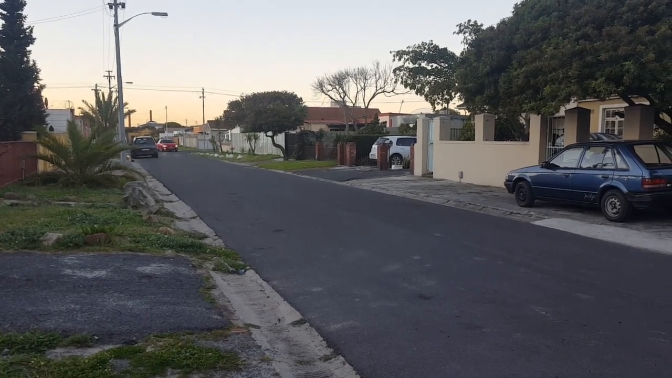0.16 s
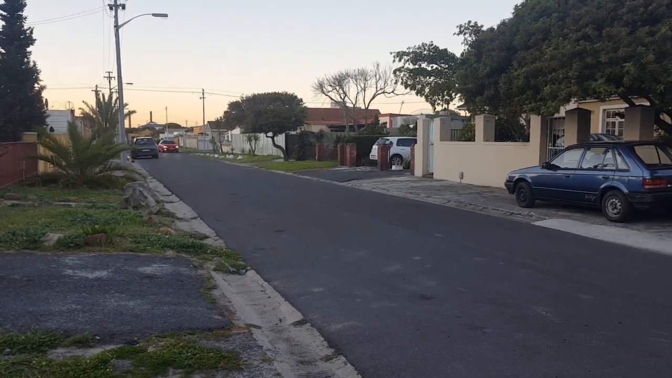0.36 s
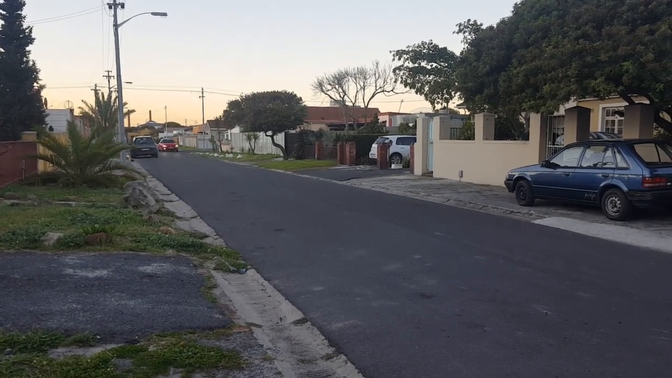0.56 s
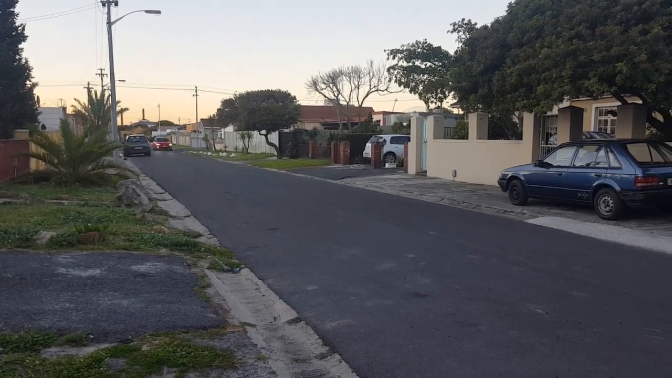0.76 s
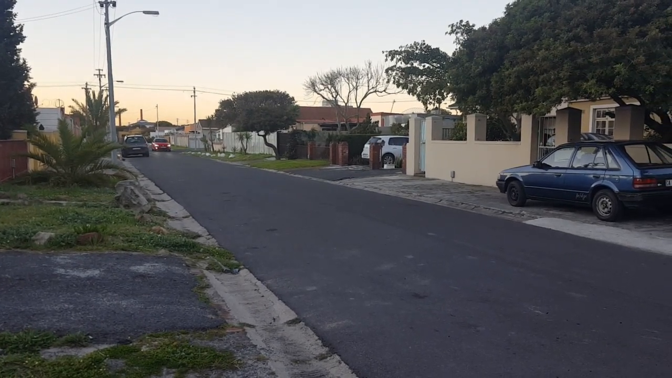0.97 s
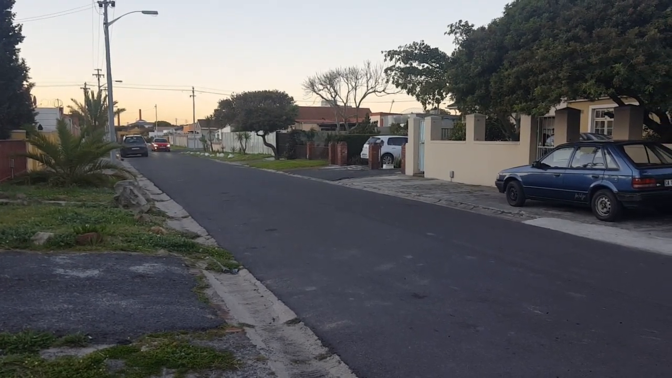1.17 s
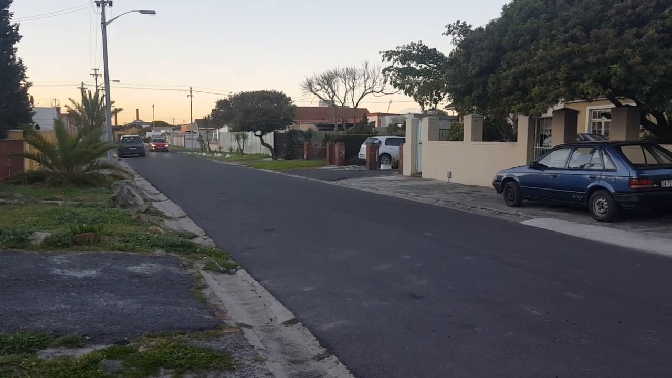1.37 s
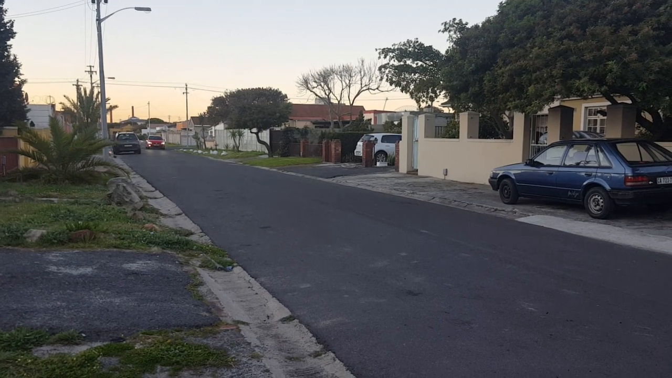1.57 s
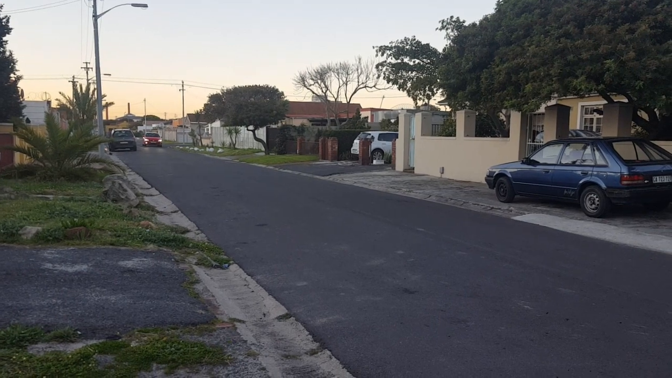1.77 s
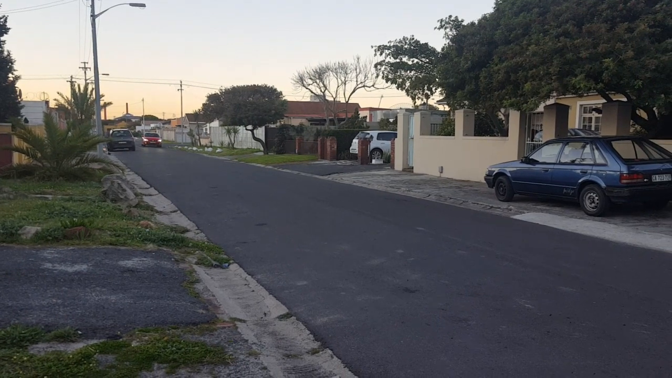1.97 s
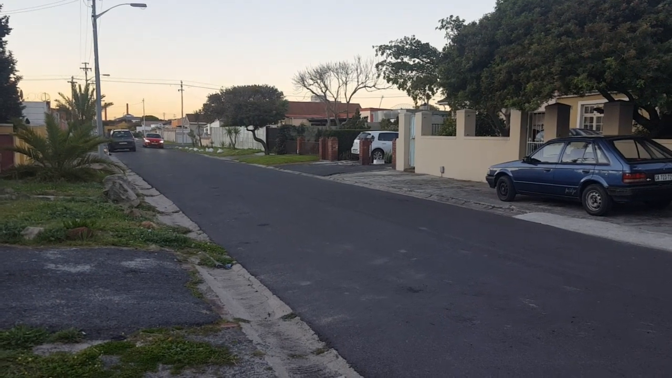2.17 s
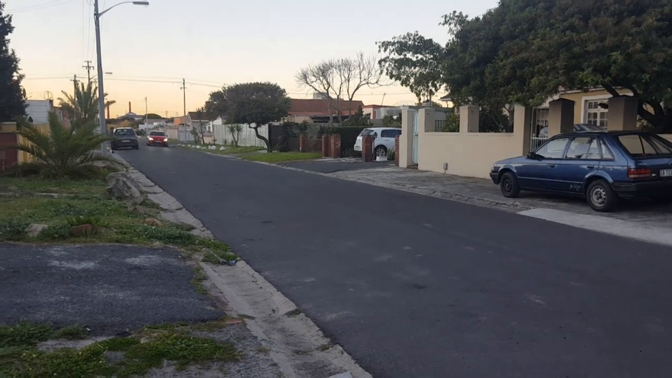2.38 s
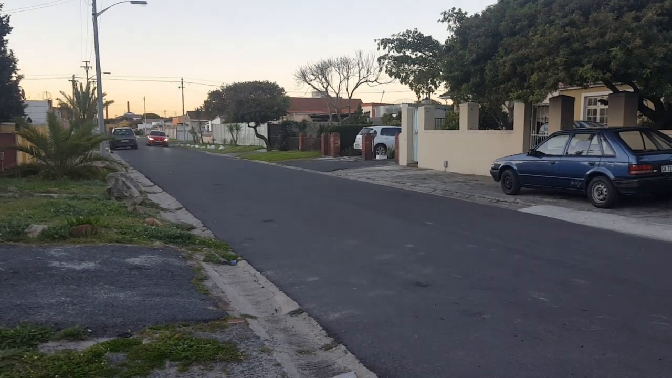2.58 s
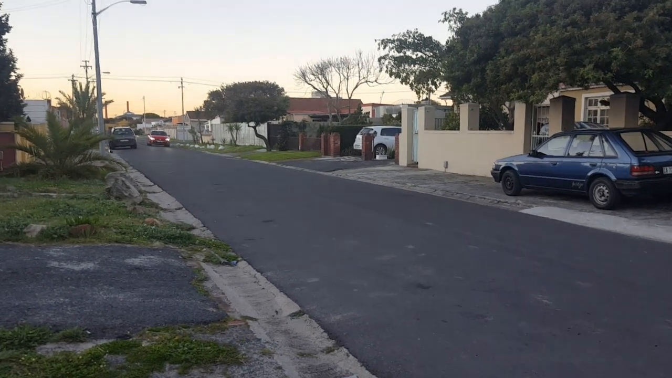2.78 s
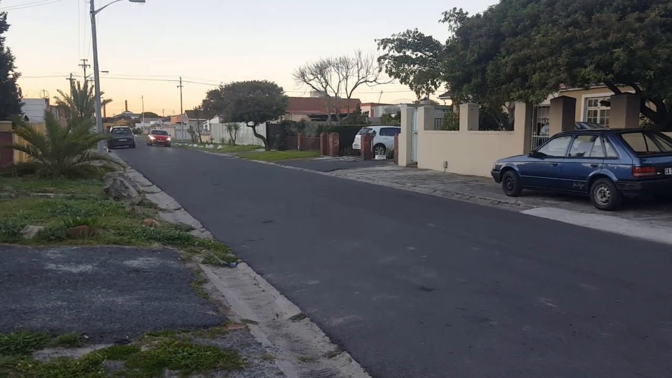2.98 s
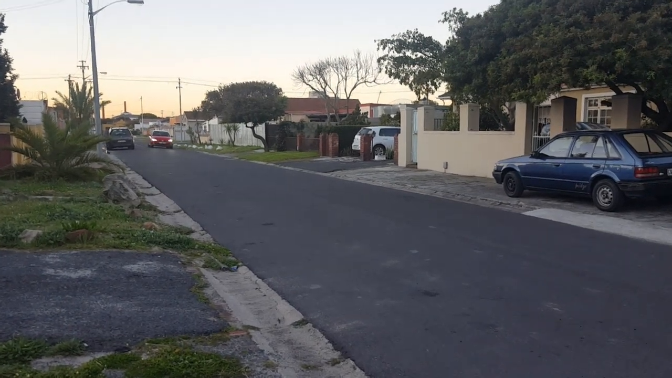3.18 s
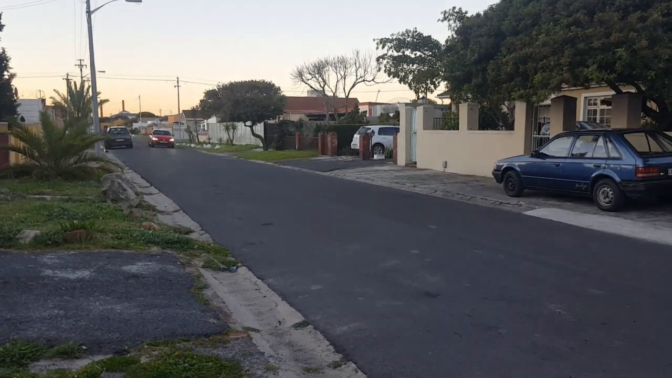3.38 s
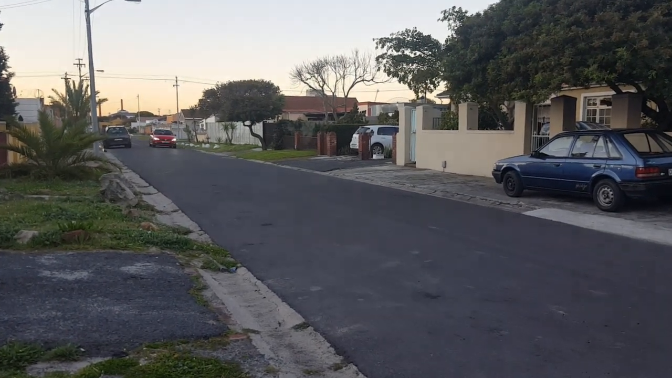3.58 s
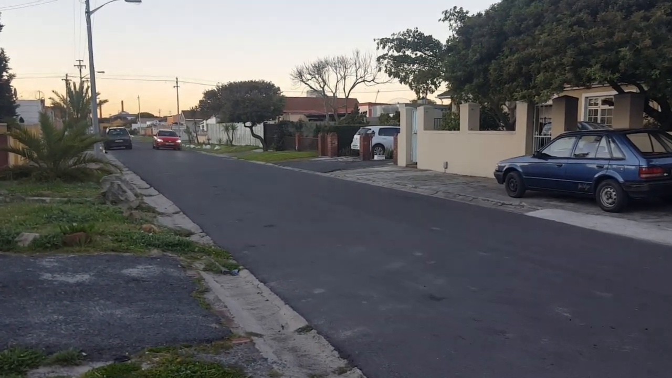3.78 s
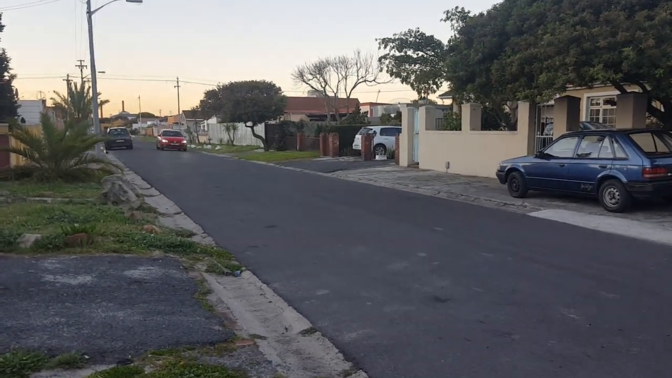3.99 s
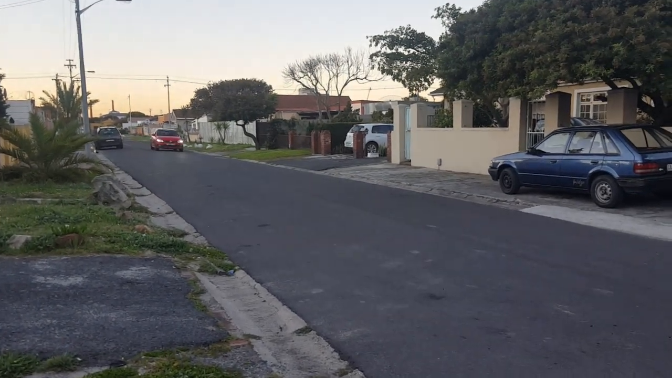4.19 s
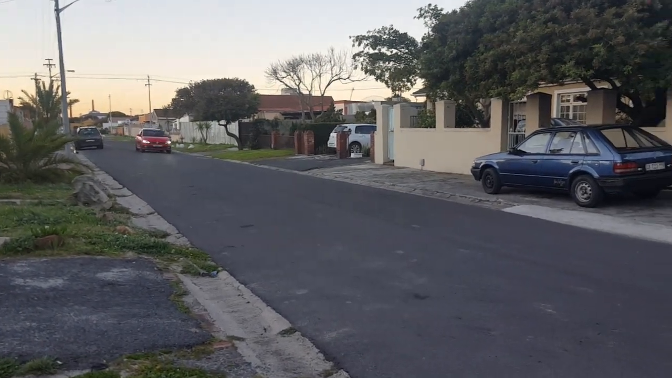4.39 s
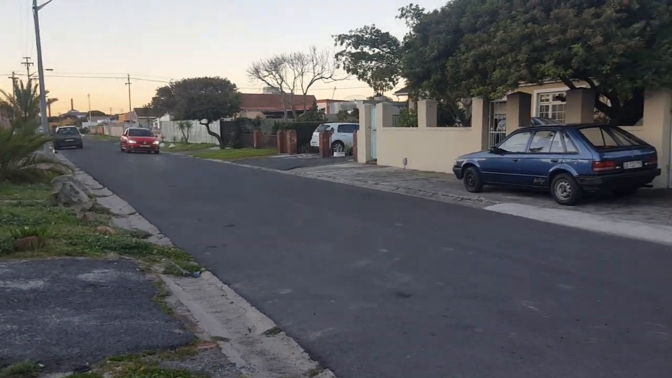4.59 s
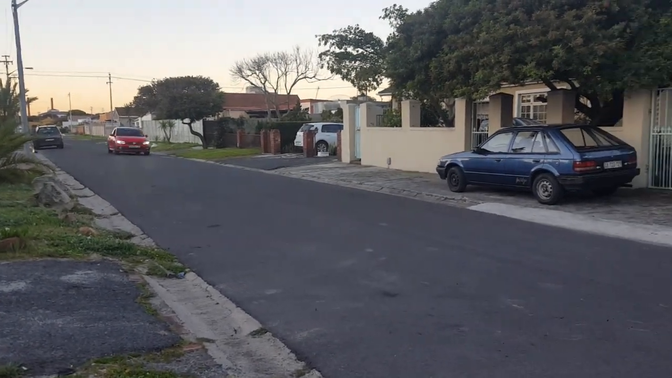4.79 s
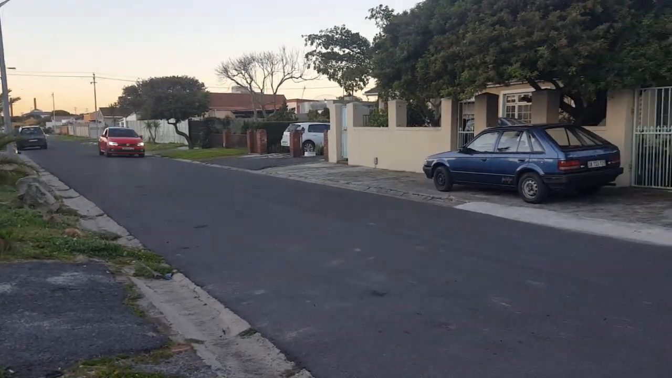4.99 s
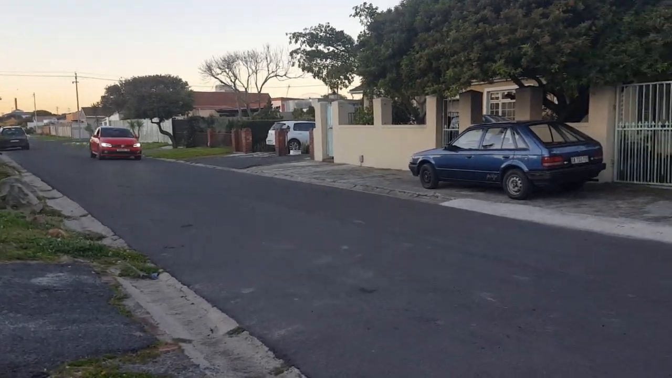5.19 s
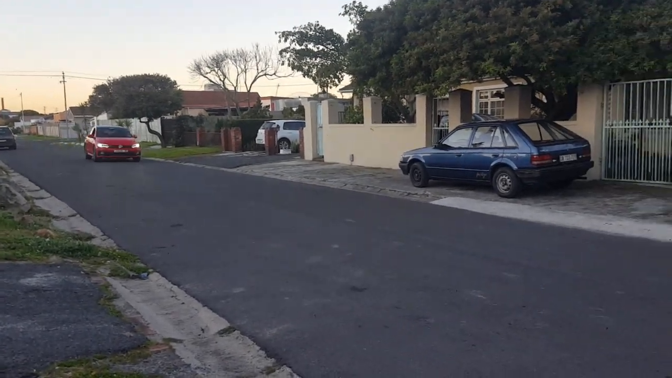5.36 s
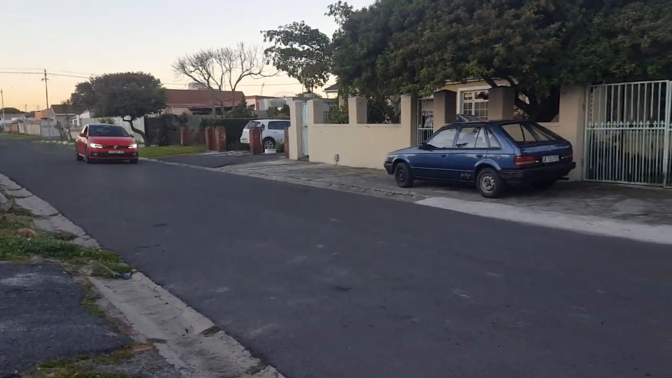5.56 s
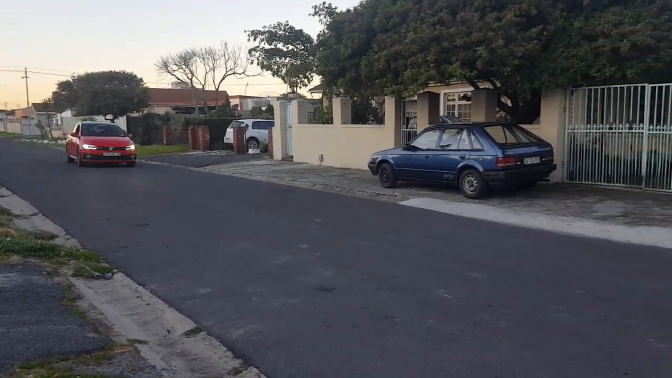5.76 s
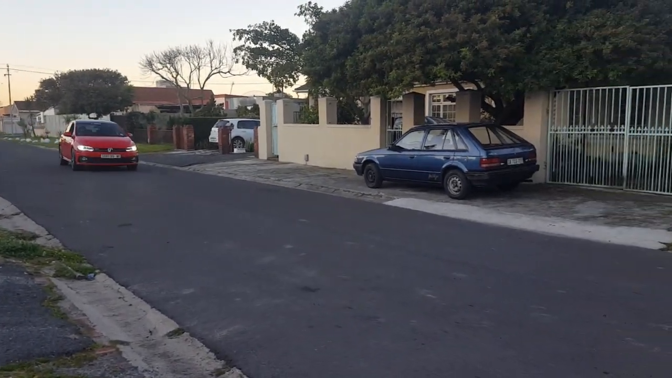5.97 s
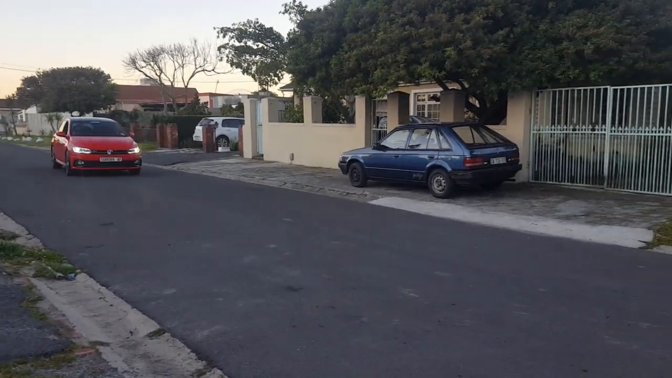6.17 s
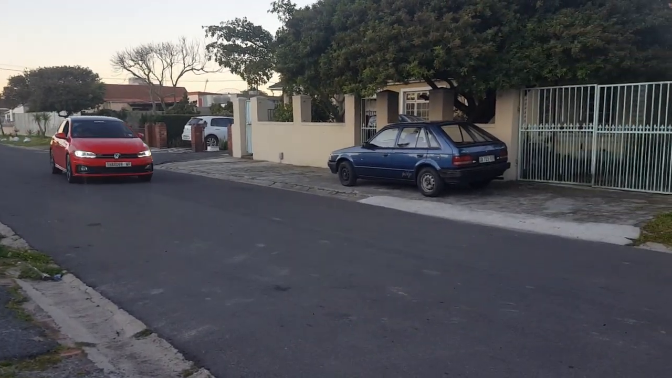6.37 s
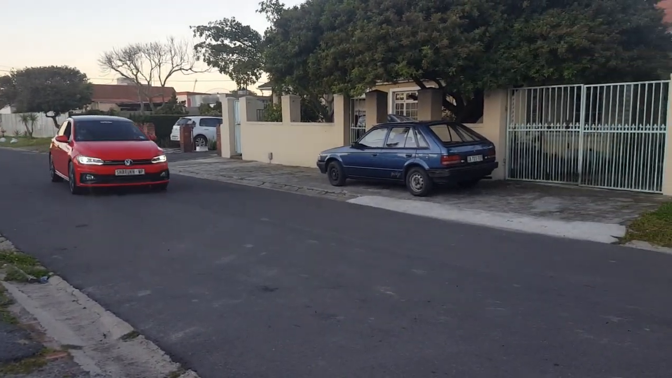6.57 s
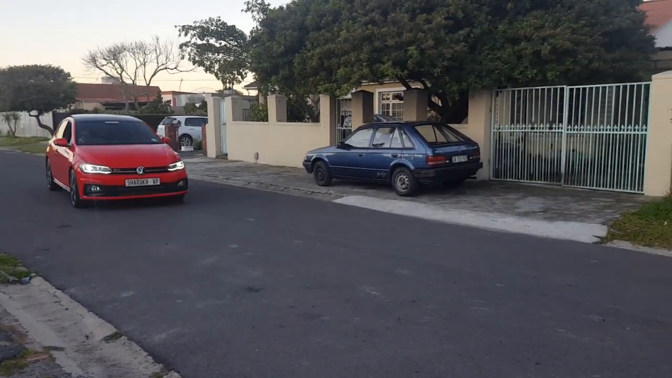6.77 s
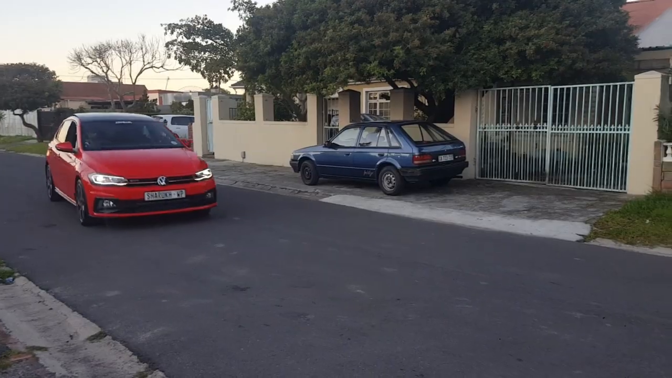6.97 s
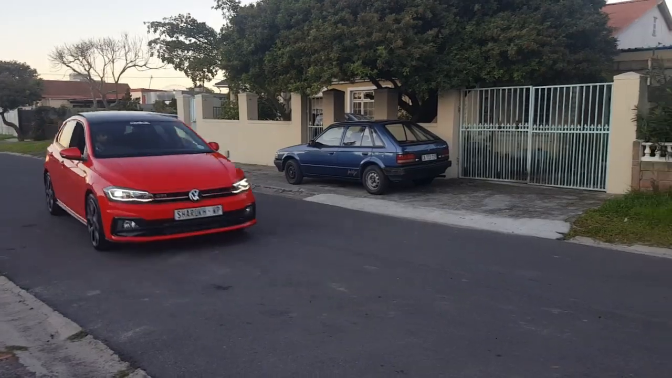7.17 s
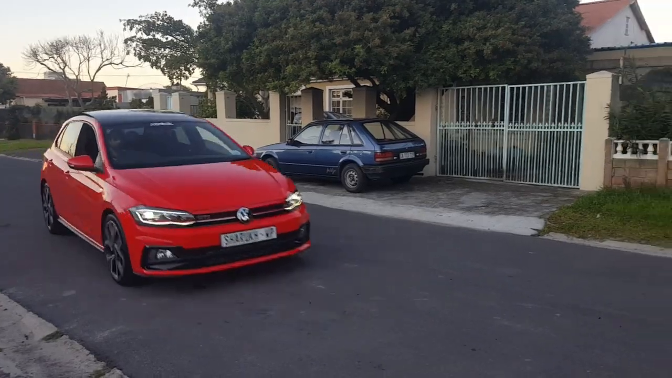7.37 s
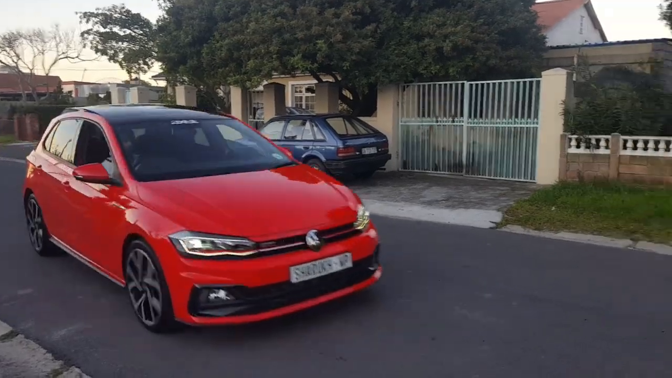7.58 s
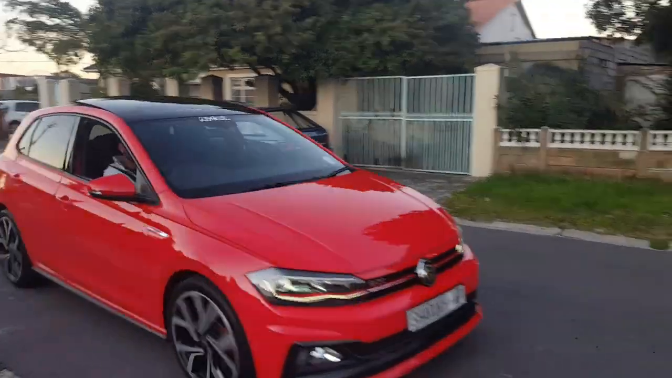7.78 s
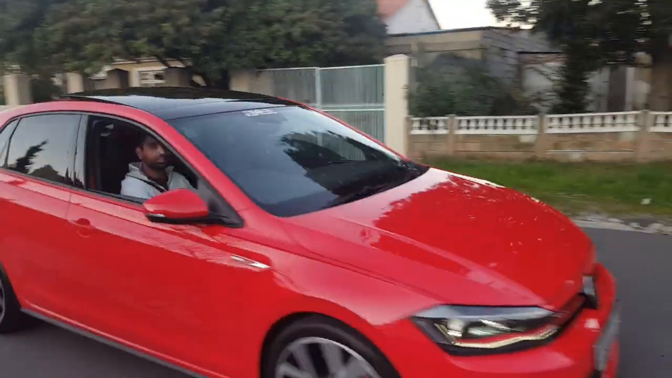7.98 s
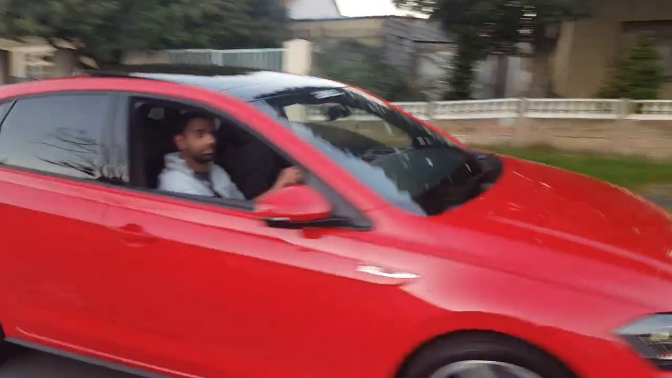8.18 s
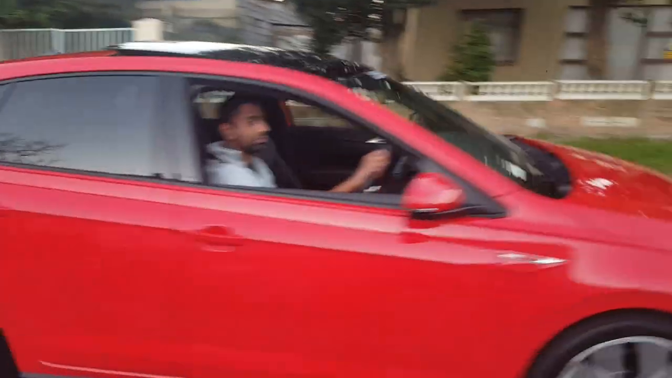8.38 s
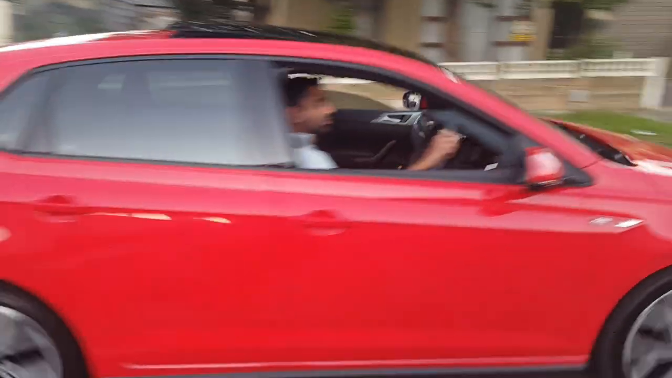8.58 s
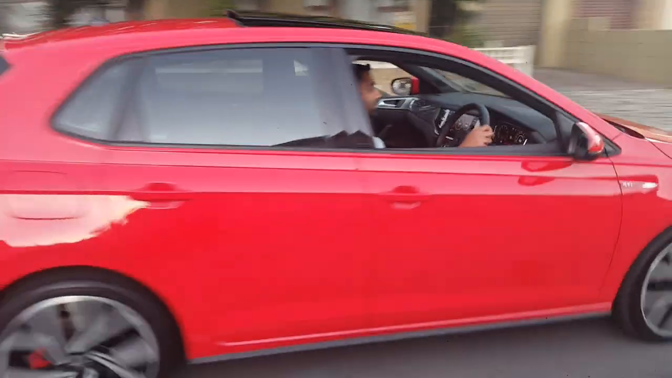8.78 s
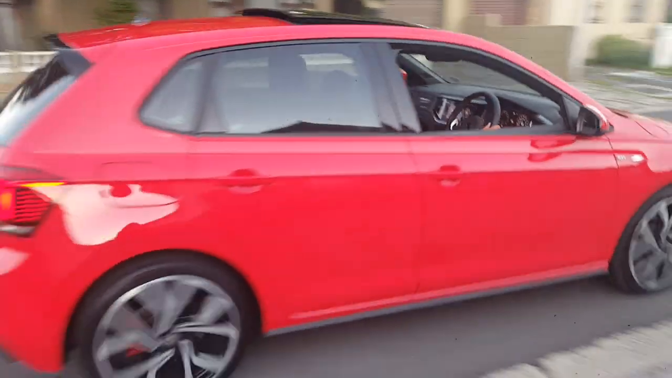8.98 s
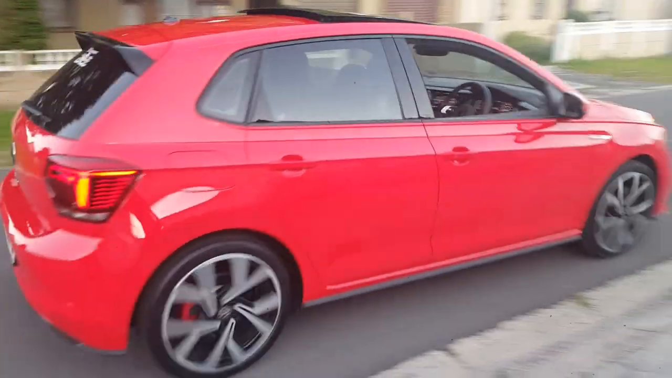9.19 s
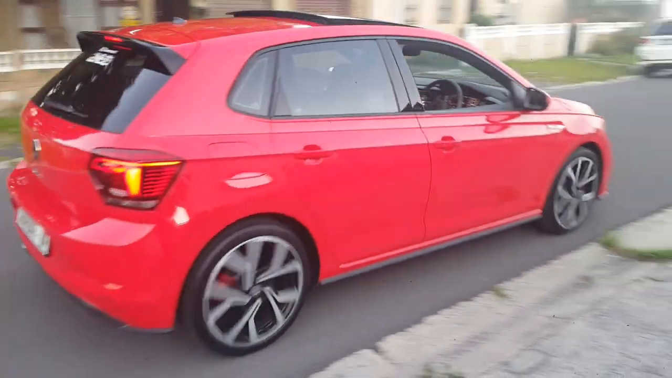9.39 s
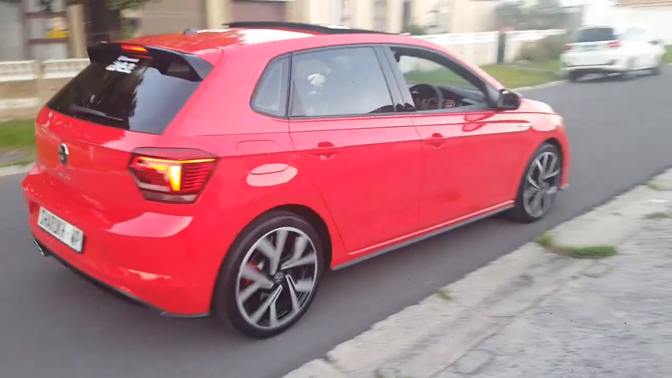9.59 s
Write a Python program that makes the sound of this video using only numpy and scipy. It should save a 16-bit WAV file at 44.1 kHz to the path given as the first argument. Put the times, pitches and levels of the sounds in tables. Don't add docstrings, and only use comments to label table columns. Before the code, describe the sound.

A loud-exhaust hatchback accelerates up a quiet walled street, shifts with pops, crackles on the overrun as it sweeps past close, then settles to a low idle throb.

```python
import sys
import numpy as np
from scipy import signal
from scipy.fft import rfft, irfft, next_fast_len
from scipy.io import wavfile
from scipy.ndimage import uniform_filter1d, map_coordinates

SR = 44100
rng = np.random.default_rng(int(sys.argv[2]) if len(sys.argv) > 2 else 0)


def store_pcm(level_fs):
    pcm = np.round(np.clip(level_fs, -1, 1) * 32767).astype(np.int16)
    wavfile.write(sys.argv[1], SR, np.atleast_2d(pcm).T)


def voltage_ratio(level):
    return 10 ** (np.asarray(level, float) / 20)


N = 425565
T = np.arange(N) / SR
ABREAST_S = 7.8

# t/s, left channel's lead/samples
BEARING = [(0, 10), (6.5, 14.5), (7.3, 11.5), (7.75, 1.5), (8.2, -12), (8.8, -10), (9.65, -6.5)]
# t/s, level/dB
EFFORT = [(0, -39), (0.5, -39.5), (0.76, -35), (1.8, -36), (2.09, -29), (2.6, -35), (2.9, -34.5),
          (3.15, -33), (3.75, -21), (4.3, -28), (4.64, -25), (5.5, -27.5), (6.1, -23.5), (7.4, -12.5),
          (8.44, -8.5), (8.8, -14.5), (9.3, -11), (9.65, -15.5)]
# t/s, lift/dB
ROUGH = [(0, 0.5), (1.6, 3), (2.2, 1), (3.2, 1), (3.75, -7), (4.3, -4), (5.1, 2), (5.5, 7), (6.7, 2.5),
         (7.2, -3.5), (8.3, -6.5), (9.1, -11), (9.65, -7)]


def unit(x):
    return x / np.sqrt(np.mean(np.abs(x) ** 2) + 1e-20)


def along(points, hz):
    f, v = np.transpose(points)
    return np.interp(np.log(hz + 1), np.log(f + 1), v)


def curves(rows, t=T):
    s, *cols = np.transpose(rows)
    return [np.interp(t, s, c) for c in cols]


def wobble(rate):
    coarse = T[::32]
    knots = rng.standard_normal(int(N * rate / SR) + 4)
    return np.interp(T, coarse, map_coordinates(knots, [coarse * rate]))


def filtered(x, response):
    m = next_fast_len(N + SR // 4)
    return irfft(rfft(x, m) * response(np.fft.rfftfreq(m, 1 / SR)), m)[..., :N]


def ring(f, c, w, db):
    return voltage_ratio(db) * 1j * f * w / (c * c - f * f + 1j * f * w)


def colour(points, hz, stretch=1):
    return unit(voltage_ratio(along(points, hz / stretch)))


def patches(hz, t):
    field = rng.standard_normal((len(hz), len(t)))
    return unit(uniform_filter1d(uniform_filter1d(field, size=4, axis=0), size=12, axis=1))


def engine(t=T):
    # t/s, f/Hz
    speed = [(0, 34.48), (.42, 36.83), (.86, 48.12), (1.32, 62.74), (2.06, 81.12), (2.2, 82.1), (2.7, 82.4),
             (3.73, 102.3), (4.28, 112.4), (4.75, 116.7), (5.12, 108.6), (5.9, 100.6), (6.33, 92),
             (6.9, 76.94), (7.85, 48.17), (8.5, 32.11), (9.05, 28.18), (9.65, 30.24)]
    # t/s, ratio to second gear
    gears = [(2.23, 1.36), (2.35, 1), (5.15, 1), (5.35, .645), (5.656, .64), (5.87, 1)]
    return curves(speed, t)[0] * curves(gears, t)[0], curves(EFFORT, t)[0]


def town(hz):
    drone = [(15, -10.5), (35, 0), (60, -3.5), (120, -42), (300, -120)]  # f/Hz, level/dB per Hz
    # f/Hz, level/dB per Hz
    traffic = [(1500, -23), (2200, -2), (3600, 2), (5000, -20.5), (7000, -28.5), (9000, -120)]
    return (voltage_ratio(-63) * colour(drone, hz)) ** 2 + (voltage_ratio(-65) * colour(traffic, hz)) ** 2


def far_engine():
    # t/s, f/Hz, level/dB
    hum = [(0.0, 107.5, -52), (0.102, 108.2, -63), (0.262, 97.4, -62), (0.58, 104.3, -61),
           (0.696, 95.4, -35.5), (0.944, 90.96, -53), (1.506, 87.44, -46.5), (1.75, 83, -67)]
    hz, db = curves(hum)
    fade = np.clip((1.75 - T) / .1, 0, 1)
    return np.sqrt(2) * fade * voltage_ratio(db + 4.3 * wobble(12.0)) * np.sin(2 * np.pi * np.cumsum(hz) / SR)


def bird():
    # t/s, f/Hz, level/dB, length/s
    chirps = [
        (0.697, 3580, -63, 0.07),
        (.785, 3350, -59.5, 0.05),
        (0.85, 3520, -65, 0.09),
    ]
    out, hoarse = np.zeros(N), wobble(150)
    for s, hz, db, length in chirps:
        u = np.clip((T - s) / length, 0, 1)
        pitch = hz * (1.06 - 0.113 * u + 0.035 * hoarse)
        out += voltage_ratio(db - 2) * np.sin(np.pi * u) * np.sin(2 * np.pi * np.cumsum(pitch) / SR)
    return out


def body_rumble(hz, t):
    # f/Hz, level/dB per Hz
    rumble = [(12, -37), (30, -34), (60, -7.5), (110, -1.5), (200, -8), (340, -5), (400, -32.5),
              (600, -41.5), (1000, -120)]
    lumps = np.interp(t, T, wobble(8))
    strength_db = curves(EFFORT, t)[0] + curves(ROUGH, t)[0] - 12
    return voltage_ratio(strength_db + .7 * lumps + 1.5 * patches(hz, t)) * colour(rumble, hz)


def tyre_roar(hz, t, roar_db, far, past, swell, surge_db):
    # f/Hz, level/dB per Hz
    coming = [(220, -43), (380, -3.5), (500, -12.5), (662, -1), (843, -21), (1010, -12), (1200, -11),
              (1370, -26.5), (1720, -7.5), (2110, -22.5), (2600, -28.5), (3380, -63), (5720, -120)]
    near = [(220, -39.5), (380, -14.5), (415, -8), (450, 4.5), (533, -7), (631, 3.5), (678, 0), (741, -7.5),
            (797, -8.5), (921, -1), (1040, -0.5), (1320, -5.5), (1670, -5.5), (2300, -14.5), (2600, -20.5),
            (3380, -52.5), (5720, -120)]
    leaving = [(220, -22.5), (380, -32), (529, -26.5), (771, 0), (863, 0), (1300, -9), (1570, 2),
               (1870, -4), (2090, 1), (2600, -5), (3380, -8), (5720, -120)]
    roar = far * colour(coming, hz) + (1 - far - past) * colour(near, hz) + past * colour(leaving, hz)
    return roar * voltage_ratio(roar_db + 0.44 * swell + surge_db + 1.42 * patches(hz, t))


def tread_hiss(hz, t, roar_db, far, past, swell, surge_db):
    # f/Hz, level/dB per Hz
    near = [(1290, -29.5), (2200, -6.5), (2340, 3), (2560, 1), (2840, 2), (4130, -2.5), (4790, -6),
            (5150, -4), (5610, -4.5), (6150, -10), (6910, -17), (8150, -34.5), (9500, -38.5),
            (12400, -69.5), (20900, -120)]
    leaving = [(1290, -33.5), (2200, -2.5), (4180, -2.5), (4850, -4), (5930, -9.5), (6830, -19),
               (8720, -21.5), (9500, -46), (12400, -54), (20900, -120)]
    # t/s, frequency stretch
    bright = [(0, 1.27), (3.9, 1.104), (4.7, 1.06), (6.4, 1.08), (7.1, 1.19), (9.65, 0.96)]
    open_tread_db = 1.5 * np.exp(-((t - ABREAST_S) / 1.8) ** 2)
    hiss_db = roar_db - 14.5 + 12.5 * past + 3.5 * far + open_tread_db
    haze_db = -6 * np.sqrt(far) * (hz / 5000) ** 2
    hiss = (1 - past) * colour(near, hz, curves(bright, t)[0]) + past * colour(leaving, hz)
    hiss = hiss * voltage_ratio(hiss_db + haze_db + 0.3 * swell + surge_db + 1.4 * patches(hz, t))
    notch_s, notch_half_s, notch_hz, notch_log_width, notch_db = 5.3, 1.3, 5150, .045, -5
    off_centre = np.log((hz + 1) / notch_hz) / notch_log_width
    return hiss * voltage_ratio(notch_db * np.exp(-((t - notch_s) / notch_half_s) ** 2 - off_centre ** 2))


def bay_air(hz, t, lift_db):
    # f/Hz, level/dB per Hz
    air = [(5000, -31), (8500, 4.5), (10100, -5), (11800, 4.5), (15100, 0.5), (15700, -7)]
    distance = np.hypot(1, (t - ABREAST_S) / 0.58)
    return voltage_ratio(-59.5 - 1.28 * 20 * np.log10(distance) + lift_db) * colour(air, hz)


def road(hz, t):
    # t/s, level/dB
    roar_level = [(0, -59.5), (1, -52), (1.93, -44), (2.6, -43.5), (3.25, -40.5), (3.5, -38), (3.8, -37),
                  (4, -39), (4.65, -35), (5.2, -33), (5.4, -32.5), (5.83, -30), (6.07, -32.5),
                  (6.69, -28.5), (7.82, -30), (8.68, -38.5), (9.65, -42)]
    # t/s, place (far -1, near 0, seen from behind 1)
    passing = [(0, -0.21), (2.5, -0.56), (4, 0.17), (7.3, -0.093), (8.1, 0.49), (9.65, 0.72)]
    # t/s, change/dB, half length/s, f/Hz, air change/dB
    surges = [(2.05, 4, .27, 6800, 1.5), (3.424, 8, .063, 3100, 10), (5.119, 3, .049, 5510, 6),
              (6.8, 4, .059, 7000, 5), (8.724, 2, .11, 5400, -1), (5.45, 4, .2, 1100, 0),
              (6.15, 3, .3, 6000, 0), (6.6, -2, .3, 2800, 0), (7.3, 2, .25, 7500, 0),
              (7.52, 2.5, .15, 2500, 0), (7.1, -2, .15, 3200, 0), (8.55, 2, .2, 5500, 1),
              (5.5, -1, .9, 5150, 0), (3.43, 3, .05, 3000, 0), (8.57, -5, .07, 1700, 0),
              (9.2, -2, .4, 1700, 0), (1.1, 2.5, .2, 1300, 0), (8.74, 4, .04, 1500, 0), (7.5, 2, .2, 620, 0),
              (8.95, -3, .12, 650, 0)]
    roar_db, = curves(roar_level, t)
    place, = curves(passing, t)
    far, past = np.clip(-place, 0, 1), np.clip(place, 0, 1)
    surge_db, air_db = 0, 0
    for s, db, half, c, air_lift in surges:
        bump = np.exp(-((t - s) / half) ** 2)
        surge_db = surge_db + bump * db * (0.078 + np.exp(-np.log((hz + 1) / c) ** 2 / 0.14))
        air_db = air_db + bump * air_lift
    swell = np.interp(t, T, wobble(4))
    power = body_rumble(hz, t) ** 2 + bay_air(hz, t, air_db) ** 2 + town(hz)
    power = power + tyre_roar(hz, t, roar_db, far, past, swell, surge_db) ** 2
    return np.sqrt(power + tread_hiss(hz, t, roar_db, far, past, swell, surge_db) ** 2)


def rush(gain):
    # f/Hz, coherence (0-1)
    alike = [(30, .9), (150, .97), (400, .95), (800, .88), (1500, .76), (3000, .5), (6000, .38),
             (12000, .22)]
    # f/Hz, left minus right/dB
    lean = [(60, 3.5), (180, -0.5), (550, 0.5), (1650, -1), (4970, -1.5), (15000, -2.5)]
    hz, t, z = signal.stft(rng.standard_normal((2, N + 2048)), SR, nperseg=1024)
    turn = np.arccos(np.clip(along(alike, hz), 0, 1))[:, None] / 2
    shaded = hz * (.55 + .45 / (1 + (5000 / (hz + 1)) ** 6))
    lead = np.exp(1j * np.pi * np.outer(shaded, curves(BEARING, t)[0]) / SR)
    lead = lead * voltage_ratio(along(lean, hz) / 2)[:, None]
    mid, side = np.cos(turn) * z[0], np.sin(turn) * z[1]
    pair = np.array([(mid + side) * lead, (mid - side) / lead]) * gain(hz[:, None], t)
    return signal.istft(pair, nperseg=1024)[1][:, :N]


def throb():
    hz = engine()[0]
    depth = .3 * np.exp(-((T - 8.0) / .7) ** 2)
    late_s = .005
    puffs = np.cos(2 * np.pi * (np.cumsum(hz) / SR - hz * late_s))
    return (1 + depth * puffs) / np.sqrt(1 + depth ** 2 / 2)


def grit():
    # t/s, peak level/dB, f/Hz
    stones = [(0.8096, -62.5, 3580), (2.4758, -44, 4180), (2.5235, -47.5, 4500), (2.5444, -50.5, 3564),
              (2.4758, -50.5, 5700), (3.2, -45.5, 3700), (3.6406, -62.5, 11500), (2.4748, -68, 12000),
              (7.797, -50, 7520), (7.797, -58, 11500), (7.913, -52, 4200), (8.12, -48, 7770),
                   (8.12, -58, 12000), (8.77, -40, 2100), (9.095, -58, 13500), (9.312, -44, 2200)]
    out, t = np.zeros((2, N + SR)), np.arange(400) / SR
    for s, db, hz in stones:
        rough = uniform_filter1d(rng.standard_normal((2, len(t))), size=round(36000 / hz)) * 3
        decay = voltage_ratio(db + 8.0 - 60 * t / 0.0047)
        out[:, round(s * SR):][:, :len(t)] += decay * (1 + 0.96 * rough) * np.sin(2 * np.pi * hz * t)

    def small_body(f):
        band = 1 / (1 + (1500 / (f + 1)) ** 4) / (1 + (f / 15000) ** 6)
        return band * (1 - .85 * np.exp(-((f - 9600) / 1000) ** 2))

    return filtered(out[:, :N], small_body)


def brake():
    start_s, end_s, hz, db = 8.28, 8.64, 2870, -53.5
    touch = np.sin(np.pi * np.clip((T - start_s) / (end_s - start_s), 0, 1)) ** .5
    return np.sqrt(2) * touch * voltage_ratio(db + 2.1 * wobble(30)) * np.sin(2 * np.pi * hz * T + .3 * wobble(40))


def pipe(f):
    # f/Hz, width/Hz, level/dB
    modes = [(118, 30, -4), (205, 23, 0.5), (263, 23, 0), (322, 28, 0.5)]
    cut = (1 / (1 - (f / 350) ** 2 + 1j * f / 350 * 1.02)) ** 2
    held = np.clip(f - 120, 0, 260)
    smear_s_per_hz = 2.5e-5
    smear = np.exp(-1j * np.pi * smear_s_per_hz * held * (2 * f - 240 - held))
    return cut * smear * sum((-1) ** k * ring(f, *mode) for k, mode in enumerate(modes))


def shell(f):
    return (ring(f, 635, 60, -15) - ring(f, 520, 200, -27)) * ring(f, 600, 340, 0)


def fade_db(hz, t):
    # t/s, f/Hz, change/dB, half length/s
    fades = [(0.62, 114, -4.0, 0.05), (0.66, 58, -14.5, 0.2), (0.68, 177, 6, 0.074), (1.06, 148, 3.5, 0.08),
             (1.12, 77, -3, 0.13), (1.48, 91, 10.5, 0.048), (1.74, 99, -14.5, 0.22),
             (2.02, 109, -3.5, 0.08), (2.16, 111, -10.5, 0.046), (2.46, 165, -7.5, 0.14),
             (2.6, 82, 11.5, 0.14), (2.74, 166, 9.5, 0.08), (2.88, 86, -20, 0.084), (2.9, 173.1, -9, 0.091),
             (3.12, 182, 2, 0.13), (3.64, 101, -15.5, 0.1), (3.86, 105, 10.5, 0.13),
             (3.98, 106, -22.5, 0.4), (4.28, 112, 8.5, 0.05), (4.5, 114, -9, 0.049), (4.66, 115, 8.5, 0.05),
             (4.68, 116, -9, 0.22), (4.78, 116, -9, 0.046), (5.18, 102.4, 3, 0.4), (5.3, 78, 6, 0.08),
             (5.5, 67, 8.5, 0.14), (5.56, 133.9, -6.5, 0.035), (5.7, 73, -11, 0.048),
             (5.86, 98, -17, 0.062), (6.1, 98, 6.0, 0.086), (6.32, 187, 7.0, 0.23), (6.8, 80, -4.5, 0.08),
             (7.02, 149, -13, 0.39), (7.12, 70, 5.5, 0.099), (7.7, 155, -9, 0.13), (7.74, 101, -7.5, 0.4),
             (8.02, 44.4, 3, 0.4), (8.1, 168, -8, 0.08), (8.38, 140, -9.5, 0.39), (8.52, 94, 3, 0.37),
             (8.78, 60, -10, 0.4), (8.84, 30, -11.5, 0.08), (8.98, 57, 8, 0.05), (8.98, 115, -3, 0.089),
             (9.26, 87, -7, 0.055), (9.58, 60, -2, 0.4),
             (0.525, 214, -7, 0.069), (0.843, 259, 8.5, 0.038), (1.0, 214, -7.0, 0.044),
                (1.08, 225, 7, 0.05), (1.1, 303, -11, 0.1), (1.618, 191, -7, 0.056), (1.64, 288, 8, 0.1),
                (1.78, 202, 4, 0.13), (1.92, 211, -13, 0.043), (2.243, 328, 15.5, 0.077),
                (2.66, 247, -18, 0.055), (2.68, 330, -12.0, 0.08), (2.84, 256, 10, 0.04),
                (3.08, 360, 8, 0.043), (3.32, 190, -15, 0.073), (3.34, 286, 10, 0.073),
                (3.48, 392, 8.0, 0.08), (3.54, 298, -6.5, 0.097), (3.72, 411, -8, 0.08),
                (3.782, 208, -2, 0.1), (3.823, 313, -20.0, 0.077), (3.84, 209, -25, 0.05),
                (3.898, 423, 9.5, 0.4), (4.0, 322, 3.5, 0.087), (4.16, 439, -13.0, 0.08),
                (4.384, 338, -13, 0.035), (4.456, 227, -6.0, 0.13), (4.642, 346, 14, 0.24),
                (4.72, 464, 6, 0.47), (4.4, 346, -4.5, 0.039), (5.04, 220, -15.5, 0.37),
                (5.06, 329, 11, 0.072), (5.16, 319, -6.5, 0.13), (5.202, 294, -12.5, 0.08),
                (5.3, 313, 6.0, 0.33), (5.46, 203, -19, 0.067), (5.68, 210, 8, 0.058),
                (5.8, 359, 16.0, 0.22), (5.86, 298, 7, 0.14), (5.943, 200, -8.5, 0.043),
                (6.26, 281, -6.0, 0.19), (6.8, 318, 15.5, 0.077), (7.338, 191, -17.5, 0.49),
                (7.336, 191, 15, 0.05), (7.44, 242, -9, 0.062), (7.84, 194, 9.5, 0.15)]
    log_width = .16
    return sum(db * np.exp(-((t - s) / half) ** 2 - (np.log(hz / c) / log_width) ** 2)
               for s, c, db, half in fades)


def low_orders(turns, far):
    # f/Hz, level/dB
    outlet = [(30, -32), (55, -18), (80, -10), (115, 0.0), (155, -4), (200, -3), (325, -4.5), (420, -17)]
    order_level = [1, -3, -11, -14.5]
    t = T[::64]
    tones = engine(t)[0] * np.arange(1, 5)[:, None]
    tone_db = along(outlet, tones) + np.c_[order_level] + fade_db(tones, t)
    effort_db = engine()[1]
    thud_hz, thud_width_hz, late_s = 115, 60, .002
    out = np.zeros(N)
    for k, (f, db) in enumerate(zip(tones, tone_db)):
        lag = -np.arctan2(f * thud_width_hz, thud_hz ** 2 - f ** 2) - 2 * np.pi * f * late_s
        shake_db = (.7 + .5 * k) * far * wobble(15) + 0.59 * wobble(12)
        phase = 2 * np.pi * (k + 1) * turns + np.interp(T, t, lag) + 0.09 * (k + 1) * wobble(30)
        out += np.sqrt(2) * voltage_ratio(effort_db + np.interp(T, t, db) + shake_db) * np.cos(phase)
    return out


def firing_pulses(turns, far):
    cylinders = [0.32, 0.51, -0.5, 0.2]
    # t/s, share (0-1)
    unevenness = [(0, .28), (1, .15), (5.1, .1), (5.5, .2), (6.7, .1), (7, .05), (7.6, .05), (8.2, .09),
                  (8.9, .09), (9.65, .05)]
    # t/s, level/dB
    upper_level = [(0, -25.5), (1, -17.5), (2, -10.5), (3, -10.5), (3.75, -20.5), (4.6, -8.5), (5.3, -11.5),
                   (5.6, -3), (6.2, -27), (7.2, -18.5), (7.9, -19), (8.4, -24), (9.0, -33.5), (9.35, -24),
                   (9.65, -19.5)]
    hz, effort_db = engine()
    at = np.flatnonzero(np.diff(np.floor(turns)))
    share = np.clip(curves(unevenness)[0][at], 0, 1)
    spread = share * (np.resize(cylinders, len(at)) + .5 * rng.standard_normal(len(at)))
    even, odd = np.zeros((2, N))
    even[at], odd[at] = 1, 4 * spread
    even -= hz / SR * (1 + sum(2 * np.cos(2 * np.pi * k * turns) for k in range(1, 5)))
    even *= voltage_ratio(effort_db + curves(upper_level)[0] + 1.7 * far * wobble(6.8))
    odd *= voltage_ratio(effort_db + curves(ROUGH)[0] - 22 + 2.1 * wobble(5.4))
    return SR / hz / np.sqrt(2) * (even + odd)


def exhaust():
    # from/s, to/s, change/dB
    cuts = [(2.2, 2.343, -7.5), (5.664, 5.85, -2), (6.504, 6.746, -4), (8.495, 8.654, -7.5),
            (8.776, 8.974, -5.5)]
    # t/s, delay/ms
    wall_path = [(0, 11.5), (2, 9.7), (4, 17.5), (6, 24.6), (7.5, 25), (8.5, 21.1), (9.65, 16.95)]
    turns = np.cumsum(engine()[0]) / SR
    far = np.clip((ABREAST_S - T) / 4.1, .15, 1)
    pulses = firing_pulses(turns, far)
    shell_db = 9 * far - 10 * np.clip(2 * (T - 8.3), 0, 1)
    rung = filtered(pulses, pipe) + voltage_ratio(shell_db) * filtered(pulses, shell)
    echo_share = .5 * far + .8 * np.clip(4 * (T - 9.1), 0, 1)
    rung += echo_share * np.interp(T - curves(wall_path)[0] / 1000, T, rung)
    cut_db = sum(db * uniform_filter1d(1. * ((T > a) & (T < b)), size=900) for a, b, db in cuts)
    return voltage_ratio(cut_db) * (low_orders(turns, far) - rung)


def pops():
    # t/s, peak level/dB
    burns = [(2.206, -19), (2.224, -29), (2.235, -21.5), (2.244, -20), (2.254, -27), (2.264, -25),
             (2.273, -25), (2.281, -22), (2.287, -20), (2.303, -25), (2.31, -25), (2.316, -23.5),
             (2.346, -25), (4.991, -16.5), (5.687, -39), (5.782, -28), (6.481, -11.5), (6.528, -10),
             (6.575, -13.5), (6.603, -21), (6.624, -13), (6.639, -23), (6.671, -14), (6.714, -18),
             (8.599, -28), (8.666, -11), (8.676, -15.5), (8.701, -11), (8.718, -14), (8.976, -18)]
    thud, knock = np.zeros((2, N))
    for s, db in burns:
        at = round(s * SR)
        knock_db = -35 + 0.25 * (db + 22.5) + rng.normal(0, 0.84)
        thud[at], knock[at] = voltage_ratio(db + 39.5), voltage_ratio(knock_db + 39.5)

    def deep(f):
        return ring(f, 125, 110, 3) / (1 + 1j * f / 300) ** 2 + voltage_ratio(-8) * pipe(f)

    def shell_knock(f):
        return ring(f, 500, 260, 0) / (1 + (f / 1100) ** 4)

    return filtered(thud, deep) + filtered(knock, shell_knock)


def street(x):
    # f/Hz, t60/s
    decay = [(100, 0.16), (1000, 0.7), (8000, 0.077)]
    hz, t, z = signal.stft(rng.standard_normal((2, SR // 2)), SR, nperseg=512)
    tail = signal.istft(z * voltage_ratio(-60 * t / along(decay, hz)[:, None]), SR, nperseg=512)[1]
    delayed = np.pad(x, (600, 0))[None]
    return signal.fftconvolve(delayed, tail / np.linalg.norm(tail[0]), axes=1)[:, :N]


def scene():
    car = exhaust() + pops()
    lead = .23 * curves(BEARING)[0]
    ports = np.array([np.interp(np.arange(N) + side * lead, np.arange(N), car) for side in (1, -1)])
    song = bird()
    walls = street(voltage_ratio(-15.5) * car + voltage_ratio(-1) * song)
    return far_engine() + song + throb() * rush(road) + grit() + brake() + walls + ports


def roll_off(x):
    return signal.sosfilt(signal.butter(12, 15810, fs=SR, output="sos"), x)


def record(dry):
    # f/Hz, level/dB per Hz
    self_noise = [(2940, -31.5), (5000, -7), (7610, -14), (9440, -15), (14900, -9), (15700, -14)]
    hiss = unit(filtered(rng.standard_normal(dry.shape), lambda f: voltage_ratio(along(self_noise, f))))
    top_hz, fade_s = 15800, .004
    heard = filtered(dry + voltage_ratio(-76) * hiss, lambda f: f < top_hz)
    return roll_off(heard * np.clip((T[-1] - T) / fade_s, 0, 1))


dry = scene()
out = record(dry)
store_pcm(out)
```